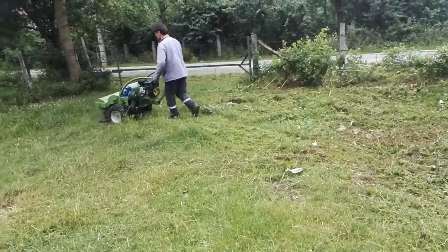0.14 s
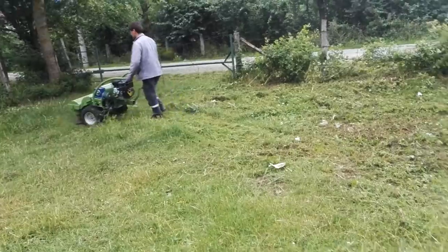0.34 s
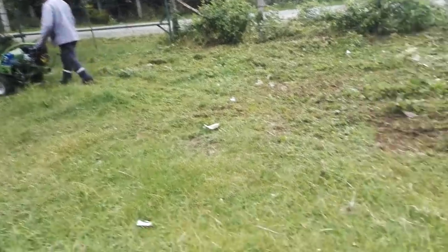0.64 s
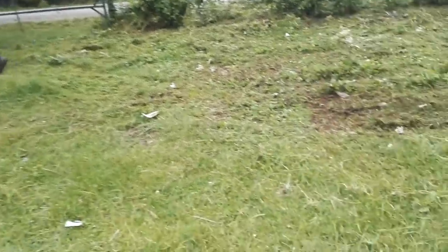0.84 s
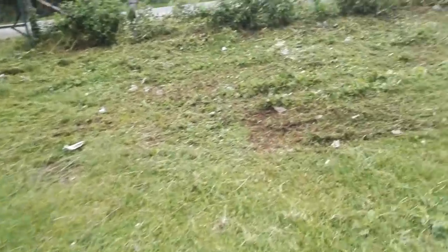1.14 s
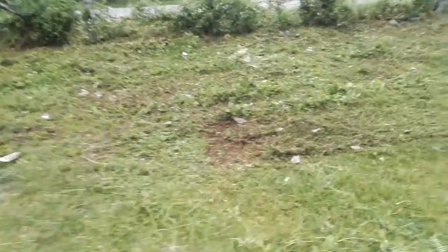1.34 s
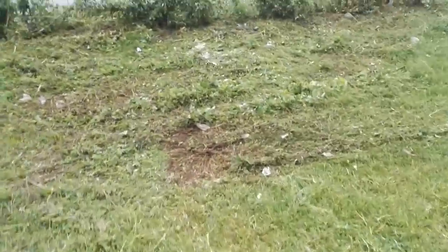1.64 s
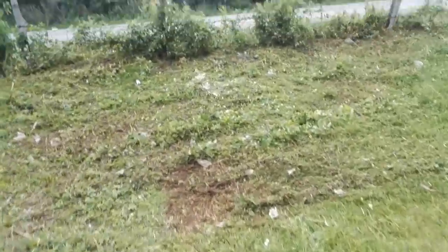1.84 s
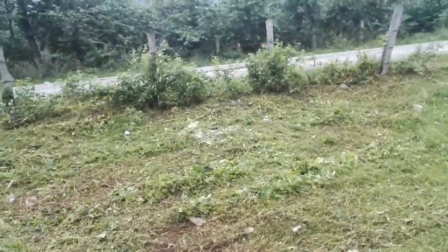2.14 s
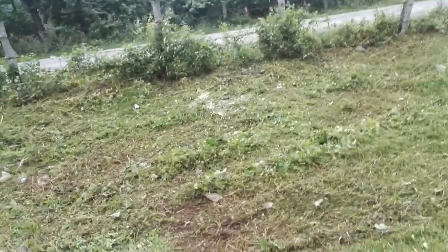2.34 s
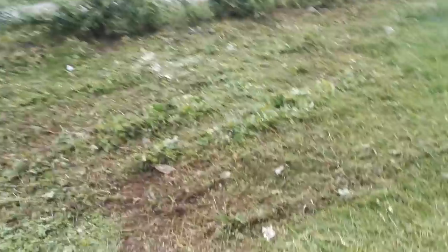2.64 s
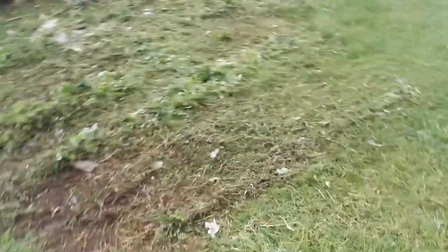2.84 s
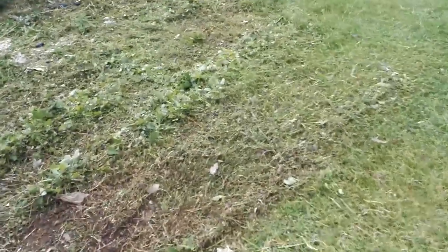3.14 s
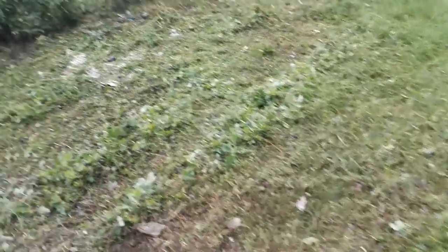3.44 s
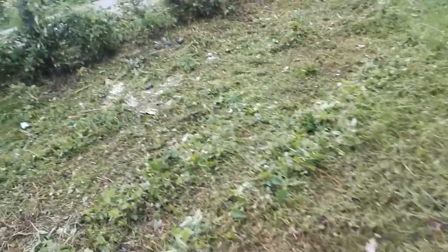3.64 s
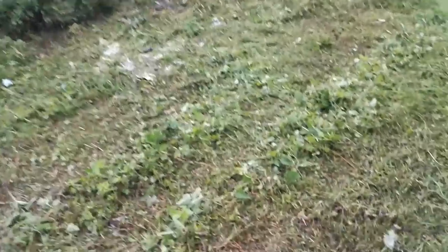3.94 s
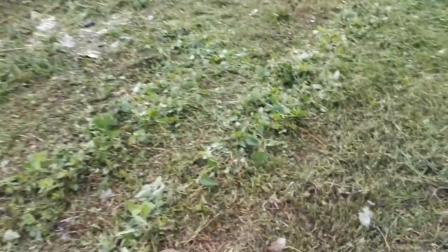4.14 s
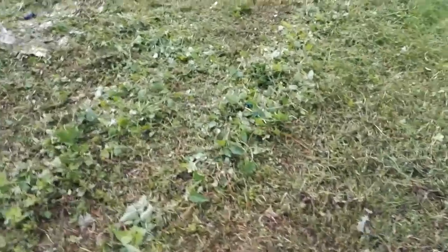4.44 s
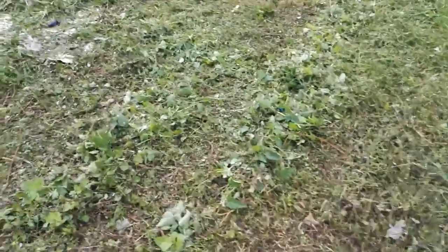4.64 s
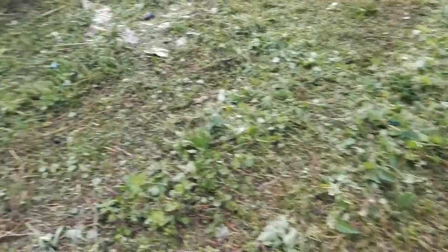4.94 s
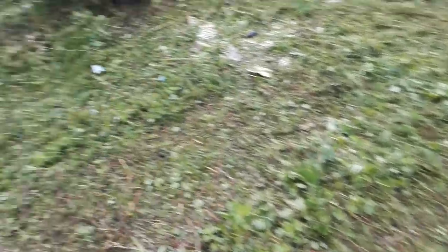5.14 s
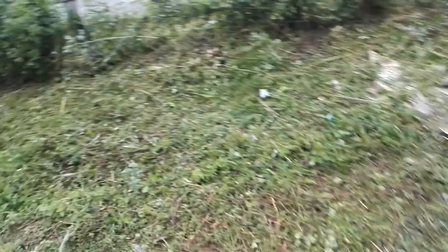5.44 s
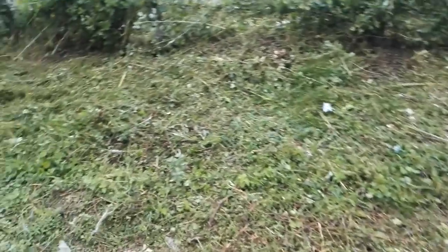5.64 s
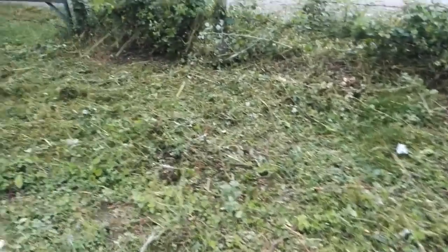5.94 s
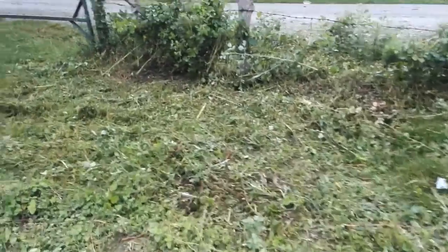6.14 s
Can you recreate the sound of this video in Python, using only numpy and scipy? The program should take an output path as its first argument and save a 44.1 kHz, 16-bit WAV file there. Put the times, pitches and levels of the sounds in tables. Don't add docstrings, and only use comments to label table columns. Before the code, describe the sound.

A walk-behind flail mower works a few metres away in an open field. Its one-cylinder engine putters fast and steadily, with gear whine, rattling sheet metal and hissing grass. Stalks snap in a cluster near the middle; later the flails rip through a thick clump, the engine sags, a stone cracks sharply, and speed recovers. Handheld stereo phone, swung around.

```python
import sys
import numpy as np
from scipy import signal
from scipy.fft import rfft, irfft, next_fast_len
from scipy.io import wavfile
from scipy.ndimage import uniform_filter1d, map_coordinates

SR = 44100
rng = np.random.default_rng(int(sys.argv[2]) if len(sys.argv) > 2 else 0)


def to_wav(sig):
    pcm = np.clip(np.atleast_2d(sig), -1, 1) * 32767
    pcm = np.round(pcm).astype(np.int16)
    wavfile.write(sys.argv[1], SR, pcm.T)


def volts_from_db(level):
    exponent = np.asarray(level, float) / 20
    return 10 ** exponent


N = 277389
TIME = np.arange(N) / SR
SIDES = np.array([[.5], [-.5]])
LEFT_ONLY = SIDES + .5

# time_s, cycle_rate_hz
ENGINE_SPEED = [(0.0, 32.9), (0.25, 32.92), (0.47, 32.21), (1.28, 32.62), (1.82, 31.79), (2.29, 32.46),
                (2.42, 32.17), (2.61, 30.4), (2.75, 29.8), (3.18, 32.53), (3.41, 32.81), (3.8, 31.78),
                (4.02, 31.97), (4.25, 32.96), (4.42, 33.16), (4.72, 29.42), (4.92, 31.37), (5.1, 32.83),
                (5.83, 33.36), (6.29, 33.6)]
GOVERNED_HZ = 33
EXHAUST_DB, EXHAUST_LOAD_DB_PER_HZ = -37.5, 1.5
# multiple_of_cycle_rate, level_db
MUFFLER_GAIN = [(1, -17.5), (2, -5), (3, -5.5), (4, -10.5), (5, 3.5), (6, 1.5), (7, -7.5), (8, 4), (9, -13),
                (10, -13), (11, -6), (12, -11.5), (13, -13), (14, -16)]
SHELL_HZ = 285

# time_s, tone_db, tone_left_minus_right_db, octave_db
GEAR_TONE = [(0, -32, -11, -60), (.6, -38.5, -25, -46), (1.05, -26, -7, -32), (1.25, -27, -9.5, -28),
             (1.55, -23.5, -8, -34.5), (1.95, -17.5, -1.5, -32.5), (2.3, -26, -1.5, -29),
             (2.5, -25.5, -1, -32.5), (2.75, -31.5, -18.5, -35), (3.25, -37, -14, -29.5),
             (3.75, -36, -17.5, -35.5), (4.25, -42, -20, -31), (4.95, -22, 0.5, -31.5),
             (5.25, -36.5, -20, -30), (5.5, -36, -18, -34.5), (5.75, -31.5, 16.5, -33.5),
             (6.29, -25, 3, -31)]
TEETH_PER_CYCLE = 26.75
# time_s, one_crank_turn_below_db, one_crank_turn_above_db
GEAR_SIDE_TONES = [(0, -7, -3), (.7, -7, -16), (1.2, -15, -12), (1.5, -8, -16), (1.9, -5.5, -10),
                   (2.3, 1.5, 1.5), (2.8, -17, -25), (3.6, -12, -3.5), (4.3, -6.5, 0), (5.0, -8, -13),
                   (5.6, -19, -2.5), (6.0, -20, -6.5), (6.29, -22, 4.5)]
# time_s, octave_left_minus_right_db, third_db, third_left_minus_right_db, fourth_db
GEAR_OVERTONES = [(0, -1, -44, 4, -38.5), (.45, -1, -41.5, 16, -32.5), (.9, -17.5, -42, 20, -34.5),
                  (1.3, -13, -37, 8, -42), (1.7, -15.5, -41, 0, -42), (2.15, -9, -34, -3, -59),
                  (2.45, -15, -37.5, 1, -40), (2.7, -5, -38, -4, -49), (3.15, -4, -37, -11, -37),
                  (3.6, -8, -42, -16, -36), (3.95, -8.5, -43, -17, -38), (4.2, -3, -49, -5, -37),
                  (4.7, -6, -49, -4, -52), (5.0, -6.5, -51, -5, -46), (5.4, -12.5, -44, -5, -36),
                  (5.7, -13, -42, -4, -40), (6.29, -9.5, -37, 0, -46)]
THIRD_ROUND_S, THIRD_ROUND_HALF_S = .45, .5

# time_s, level_db, gear_side_towards_right_microphone_0_to_1
MOWER_PLACE = [(0, 0, 0.5), (.4, 0.5, 0.67), (.7, 0.5, 0.5), (1.15, 2, 0.79), (1.4, -2, 0.72),
               (1.9, 1, 0.6), (2.35, 0, 1), (2.62, -3.5, 0.8), (2.85, -0.5, 0.24), (3.3, -1, 0),
               (4.2, -2.5, 0.13), (5.0, -2, 0.3), (5.45, 0, 0.1), (5.65, 0, 0.79), (6.0, 0.5, 0.99),
               (6.29, 1, 1)]

CASING_DB = -25
# frequency_hz, level_db
CASING_COLOUR = [(1480, -63), (1720, 1.5), (2200, -2), (2600, -2), (3000, -3), (4000, 1), (4800, -5),
                 (6000, -8.5), (8000, -40)]
# time_s, clatter_db, left_minus_right_db
CASING_TURN = [(0, 1, 2), (.45, -0.5, 1), (.7, -1.5, 2), (.95, -4, 6), (1.4, -2.5, 7), (1.7, -3.5, 6.5),
               (1.95, -4, 5.5), (2.4, -4, 8.5), (2.65, -3, 8), (2.9, -0.5, 1.5), (3.4, -0.5, 1),
               (4.2, 1, 0), (5.0, -1.5, 0.5), (5.45, -3, 0), (5.7, -5, 8), (6.29, -3.5, 7)]
REPEAT_CYCLES, REPEAT_DB = 4, 0

FLAIL_DB, FLAIL_FADE_DB_PER_S = -29, -0.76
FLAIL_PAN_DB, FLAIL_CENTRED_S = -7, 4.6
# frequency_hz, level_db
FLAIL_COLOUR = [(2500, -32), (4500, -47), (6000, -1.5), (8000, 4), (9500, 3.5), (11000, 7), (12500, 2.5),
                (13500, -0.5), (14700, -13)]
# time_s, extra_hiss_db, half_length_s
GRASS_TUFTS = [
    (1.0, 1.5, .1),
    (1.884, 1, 0.07),
    (2.355, 2, 0.14),
    (2.855, 5, 0.06),
    (3.89, 4.5, 0.071),
    (4.11, 4, 0.026),
    (5.401, 1, 0.066),
    (6.076, 5.5, 0.18),
]

ROAR_DB, ROAR_PAN_DB, ROAR_PAN_TURN_DB = -36, -0.5, -2.7
# frequency_hz, level_db
INTAKE_COLOUR = [(40, -61), (130, -13), (330, -3.5), (520, -4.5), (720, -3.5), (1000, -9.5), (1260, -2),
                 (1600, -5.5), (1850, -16.5)]
# frequency_hz, level_db
INTAKE_MOUTH_COLOUR = [(800, -45), (1000, 8), (1300, 7), (1500, -1.5), (1750, -17)]
# time_s, level_db, half_length_s, left_minus_right_db
INTAKE_FACING = [
    (0.1, -31.5, 0.87, -7),
    (1.5, -42, 0.43, 2),
    (2.093, -39, 0.49, -13),
    (6.105, -39.5, 0.55, -10),
]

# time_s, half_length_s, pitch_hz,
# level_db, left_minus_right_db
LOOSE_PANELS = [(0.16, 0.32, 1270, -36, -2), (.2, .35, 1850, -43.5, 9), (1.1, .3, 1890, -42, -3),
                (2.1, .2, 1270, -43, -10), (2.03, .2, 1640, -40, 6), (2.78, 0.27, 2300, -39.5, -6),
                (3.0, 0.5, 1270, -44.5, 5), (4.1, 0.081, 1660, -36, 0), (4.68, 0.074, 368, -31, 4),
                (4.68, .06, 470, -37, 1), (2.055, 0.078, 258, -39, 0), (.5, 0.26, 670, -42, -3)]
WIND_DB = -64

# time_s, peak_db, left_minus_right_db
SHARP_SNAPS = [(0.5741, -15, -7), (1.4681, -14, -3.0), (1.6249, -16, 0), (1.7508, -18, -8),
               (2.1181, -21, -3), (2.5622, -25, 0.0), (2.6933, -21, -1.0), (2.7933, -14, -2.5),
               (2.8252, -11, -8), (2.8587, -8.5, -10), (2.9235, -8, -1), (2.9559, -15, -9),
               (3.018, -16, -0.5), (3.05, -18, -0.5), (4.766, -22, -1), (5.5028, -18, 2.0)]
# time_s, peak_db, left_minus_right_db
STONE_HITS = [
    (4.7657, 0, 0),
]
# time_s, peak_db, left_minus_right_db
BRIGHT_STONE_HITS = [
    (4.3516, 4, -3),
]
# frequency_hz, level_db
SNAP_COLOUR = [(1000, -10), (2500, -17), (6000, -27), (11000, 14), (14500, -7)]
STONE_COLOUR = [(1000, -14), (3000, -2), (7000, 0), (11000, -5), (14500, -6)]
BRIGHT_STONE_COLOUR = [(1000, -25), (4000, -12), (8000, -9), (10500, 2), (14500, 0)]

# time_s, tear_db
CLUMP_PULL = [(4.366, -31.5), (4.48, -24), (4.68, -22), (4.768, -28)]
CLUMP_FADE_DB_PER_S = -190
# frequency_hz, level_db
TEARING_COLOUR = [(150, -15), (500, 4.5), (1200, 0), (2500, 1.5), (4000, 3), (6000, 2), (8000, 1),
                  (10000, 3.5), (14500, -3)]
THUD_DB, THUD_PEAK_DB, THUD_WIDTH_S = -11, 2, 0.11
# frequency_hz, level_db
THUD_COLOUR = [(40, -30), (62, -14), (100, -19), (220, -12), (350, -2), (450, -2), (750, -11), (1200, -30)]

# frequency_hz, share_0_to_1
MIC_LIKENESS = [(100, .93), (300, .97), (600, .95), (900, .9), (1150, .975), (1350, .997), (1600, .996),
                (2100, .66), (3500, .8), (4600, .62), (6200, .78), (9000, .5), (14000, .45)]
# frequency_hz, left_minus_right_db
PORT_COLOUR = [(300, 0), (700, 2.5), (1050, 1.5), (1300, 1.2), (1600, 1.8), (4000, -7), (8000, 4),
               (11000, -0.5), (14000, 4.5)]
# frequency_hz, left_late_ms
PORT_BENDING = [(100, .1), (900, .095), (1100, -.01), (1550, .1), (1800, .11), (2450, .01), (3300, .03),
                (4200, .01)]
# time_s, right_microphone_late_ms, lawn_echo_late_ms
PATH_DELAYS = [(0, 0.12, 1.15), (.3, 0.13, 1.23), (.6, 0.19, 1.24), (.95, 0.3, 1.16), (1.25, 0.33, 1.06),
               (1.5, 0.39, 1.04), (2.2, 0.425, 0.88), (2.75, 0.46, 0.91), (3.1, 0.41, 0.9), (4, 0.44, 0.86),
               (4.3, 0.386, 0.85), (4.65, 0.31, 0.82), (5, 0.36, 0.87), (5.3, 0.43, 0.8),
               (6.29, 0.447, 0.88)]
SHADOW_HZ, SHADOW_MS = (1380, 2370), 0.13
HAND_MS = .012
SWING_S, SWING_HALF_S, SWING_MS = .75, .17, .035


def play(table):
    s, *columns = np.transpose(table)
    return [np.interp(TIME, s, c) for c in columns]


def along(table, hz):
    f, v = np.transpose(table)
    return np.interp(np.log(hz + 1), np.log(f), v)


def unit(x):
    return x / np.sqrt(np.mean(x ** 2))


def walk(rate):
    k = int(SR / rate)
    held = np.repeat(rng.standard_normal(N // k + 1), k)
    return 1.95 * uniform_filter1d(uniform_filter1d(held, k), k)[:N]


def late(x, ms, order=3):
    return map_coordinates(x, [np.arange(N) - ms * SR / 1000], order=order, mode="nearest")


def bump(s, half_s):
    return np.exp(-((TIME - s) / half_s) ** 2)


def grains(rate, spread_db):
    k = int(SR / rate)
    return np.repeat(volts_from_db(spread_db * rng.exponential(size=N // k + 1)), k)[:N]


def hiss(colour, strength, locked=0):
    size = next_fast_len(N)
    hz = np.arange(size // 2 + 1) * SR / size
    like = np.clip(along(MIC_LIKENESS, hz), 0, 1)
    noise = rng.standard_normal((2, N)) + LEFT_ONLY * locked
    common, own = rfft(noise * strength, size)
    pair = np.sqrt(1 + like) * common + 2 * SIDES * np.sqrt(1 - like) * own
    return unit(irfft(pair * volts_from_db(along(colour, hz)), size)[:, :N])


def stroke(cycles, depth):
    turn = 2 * np.pi * (cycles - .03)
    return np.exp(depth * (np.cos(turn) + .08 * np.sin(2 * turn)))


def rattle(cycles):
    pattern = rng.standard_normal((int(cycles[-1] / REPEAT_CYCLES) + 2, 1351))
    return unit(map_coordinates(pattern, [cycles / REPEAT_CYCLES, cycles % 1 * 1350], order=1))


def exhaust(cycles):
    fired = np.flatnonzero(np.diff(np.floor(cycles)))
    timing, strength = rng.standard_normal((len(fired), 2)).T
    puffs = np.zeros(N)
    at = fired + (.00012 * SR * timing).astype(int)
    puffs[np.clip(at, 0, N - 1)] = volts_from_db(0.31 * strength)
    multiple = np.arange(2049) * SR / 4096 / 32.3
    order, db = np.transpose(MUFFLER_GAIN)
    gain_db = np.interp(multiple, order, db) - 5.5 * np.maximum(multiple - order[-1], 0) ** 0.5
    cepstrum = irfft(np.log(volts_from_db(np.maximum(gain_db, -80))))
    cepstrum[1:2048] *= 2
    cepstrum[2049:] = 0
    smear = np.exp(-1j * 0.016 * np.minimum(multiple, 16) ** 2)
    smear = smear * np.exp(-.5j * np.pi * (1 + np.tanh(3 * (multiple - 7.5))))
    response = irfft(np.exp(rfft(cepstrum)) * smear)
    return -unit(signal.fftconvolve(puffs, response)[:N])


def gears(cycles):
    tone_db, tone_pan, octave_db = play(GEAR_TONE)
    octave_pan, third_db, third_pan, fourth_db = play(GEAR_OVERTONES)
    turn = 2 * np.pi * cycles
    mesh = TEETH_PER_CYCLE * turn + .45 * np.sin(2 * turn + 2.5) + .25 * np.sin(turn) + .15 * walk(60)
    play_rad = 1.8 * np.tanh(walk(220) / 1.6)

    def partial(k, blur):
        return np.sin(k * mesh + blur * play_rad) * volts_from_db(3 * blur * walk(70))

    tone, octave = partial(1, .25), partial(2, .5)
    third, fourth = partial(3, .42), partial(4, .5)
    octave = octave + 0.67 * np.sin(2 * mesh + 4 * turn + 0.94 * walk(300)) * volts_from_db(2.8 * walk(6))
    for way, side_db in zip((-2, 2), play(GEAR_SIDE_TONES)):
        side_tone = np.sin(mesh + way * (turn - .7) + .7 * walk(30))
        tone = tone + volts_from_db(side_db + 1.4 * walk(12)) * side_tone
    per_firing = np.exp((.4 + .12 * np.tanh(walk(5))) * np.cos(turn - .3))
    per_turn = np.exp((.18 + .12 * np.tanh(walk(5))) * np.cos(2 * turn - 1.4))
    tone = unit(tone * per_firing ** 0.24 * per_turn ** .4) * volts_from_db(tone_db - 11.0 + SIDES * tone_pan)
    octave = unit(octave * per_firing ** .5 * per_turn ** .5) * volts_from_db(octave_db - 1.5 + SIDES * octave_pan)
    round_housing = LEFT_ONLY * bump(THIRD_ROUND_S, THIRD_ROUND_HALF_S)
    third = third + round_housing * (np.roll(third, 5) - third)
    upper = volts_from_db(third_db + SIDES * third_pan) * third + volts_from_db(fourth_db - 3.2 * SIDES) * fourth
    return tone + octave + upper * per_firing


def casing(cycles, near_db, bite):
    turned_db, pan_db = play(CASING_TURN)
    strength = stroke(cycles, 0.1) * bite ** 0.56 * grains(400, 0.73)
    clatter = hiss(CASING_COLOUR, strength, volts_from_db(REPEAT_DB) * rattle(cycles))
    return clatter * volts_from_db(CASING_DB + near_db + turned_db - 3.0 + SIDES * pan_db)


def flails(cycles, near_db, bite):
    tuft_db = sum(db * bump(s, half_s) for s, db, half_s in GRASS_TUFTS)
    level_db = FLAIL_DB + near_db + FLAIL_FADE_DB_PER_S * TIME + tuft_db
    pan_db = FLAIL_PAN_DB * np.maximum(1 - TIME / FLAIL_CENTRED_S, 0)
    beat = stroke(cycles, 0.13 * volts_from_db(3.3 * walk(12)))
    cut = hiss(FLAIL_COLOUR, beat * grains(900, 0.65) * bite * volts_from_db(0.4 * walk(6.4)))
    return cut * volts_from_db(level_db + SIDES * pan_db)


def intake(cycles, roar_db, pan_db):
    gulp = 1 + .6 * np.exp(-((cycles - .05) % 1) / .25)
    roar = hiss(INTAKE_COLOUR, gulp, volts_from_db(-3.5) * rattle(cycles)) * volts_from_db(roar_db + 4.5 + SIDES * pan_db)
    facing = sum(volts_from_db(db + SIDES * pan) * bump(s, half_s) for s, db, half_s, pan in INTAKE_FACING)
    return roar + hiss(INTAKE_MOUTH_COLOUR, gulp ** 2) * facing


def panels():
    shake_rad = .9 * walk(70)
    flutter = volts_from_db(3 * walk(40))
    hum = 0
    for s, half_s, hz, db, pan in LOOSE_PANELS:
        ring = np.sin(2 * np.pi * hz * TIME + shake_rad)
        hum = hum + volts_from_db(db + SIDES * pan) * bump(s, half_s) * ring
    return flutter * hum


def wind():
    low = signal.butter(2, 45, fs=SR, output="sos")
    return volts_from_db(WIND_DB + 2 * walk(3)) * unit(signal.sosfilt(low, rng.standard_normal((2, N))))


def snaps():
    out, age = 0, TIME[:600]
    kinds = ((SHARP_SNAPS, .0022, SNAP_COLOUR), (STONE_HITS, .0013, STONE_COLOUR),
             (BRIGHT_STONE_HITS, .0005, BRIGHT_STONE_COLOUR))
    for hits, ring_s, colour in kinds:
        burst = np.minimum(age / .0004, 1) * np.exp(-age / ring_s)
        strikes = np.zeros((2, N))
        for s, db, pan in hits:
            i = int(s * SR)
            strikes[:, i:i + 600] += volts_from_db(db - 5.5 + SIDES * pan) * burst
        out = out + strikes * hiss(colour, 1)
    return out


def clump(cycles):
    touch_s, hardest_s, free_s = CLUMP_PULL[0][0], CLUMP_PULL[2][0], CLUMP_PULL[3][0]
    tear_db = play(CLUMP_PULL)[0] + CLUMP_FADE_DB_PER_S * np.maximum(TIME - free_s, 0)
    thud_db = THUD_DB + THUD_PEAK_DB * bump(hardest_s, THUD_WIDTH_S)
    inside = np.clip((TIME - touch_s) / 0.0037 + 1, 0, 1)
    tear = hiss(TEARING_COLOUR, stroke(cycles, .07) * grains(900, .9))
    thud = hiss(THUD_COLOUR, volts_from_db(1.5 * walk(40)))
    return inside * volts_from_db(tear_db) * (volts_from_db(6.0) * tear + volts_from_db(thud_db + 2.4 * SIDES) * thud)


def lawn_echo(machine, lawn_ms):
    grass = signal.sosfilt(signal.butter(2, 1100, fs=SR, output="sos"), machine)
    return .78 * np.array([late(g, lawn_ms - .17, order=1) for g in grass])


def scene():
    speed_hz = play(ENGINE_SPEED)[0]
    cycles = np.cumsum(speed_hz) / SR
    near_db, facing = play(MOWER_PLACE)
    port_ms, lawn_ms = play(PATH_DELAYS)
    exhaust_db = EXHAUST_DB + EXHAUST_LOAD_DB_PER_HZ * (GOVERNED_HZ - speed_hz) + 0.75 * near_db
    puffs = exhaust(cycles) * volts_from_db(exhaust_db)
    shell = signal.sosfiltfilt(signal.butter(4, SHELL_HZ, "high", fs=SR, output="sos"), puffs)
    bite = volts_from_db(0.72 * walk(12))
    machine = shell + gears(cycles) + casing(cycles, near_db, bite) + flails(cycles, near_db, bite)
    machine = machine + intake(cycles, ROAR_DB + 0.45 * near_db, ROAR_PAN_DB + ROAR_PAN_TURN_DB * facing)
    machine = machine + panels() + snaps() + clump(cycles)
    machine = machine + lawn_echo(machine, lawn_ms)
    left, right = machine + puffs - shell
    band = signal.sosfiltfilt(signal.butter(2, SHADOW_HZ, "band", fs=SR, output="sos"), left)
    left = left - band + late(band, -SHADOW_MS * facing)
    shake_ms = HAND_MS * walk(5.12) + SWING_MS * bump(SWING_S, SWING_HALF_S) * walk(45.53)
    return wind() + np.array([left, late(right, port_ms + shake_ms)])


def roll_off(x):
    return signal.sosfilt(signal.butter(12, 15600, fs=SR, output="sos"), x)


def record(dry):
    size = next_fast_len(N)
    hz = np.arange(size // 2 + 1) * SR / size
    lag = np.exp(-2j * np.pi * hz * along(PORT_BENDING, hz) / 1000 * LEFT_ONLY)
    ports = volts_from_db(SIDES * along(PORT_COLOUR, hz)) * lag * (hz < 14300) * (hz > 22)
    mix = irfft(rfft(dry, size) * ports, size)[:, :N]
    return roll_off(mix)


dry = scene()
out = record(dry)
to_wav(out)
```